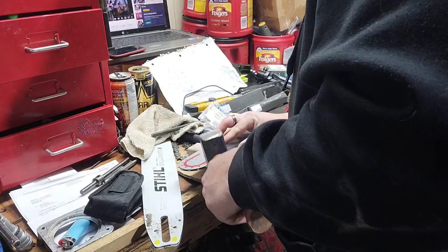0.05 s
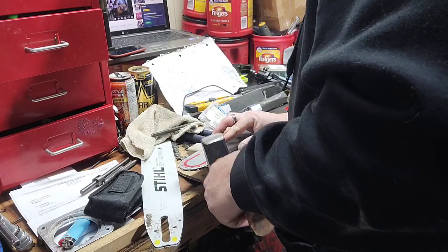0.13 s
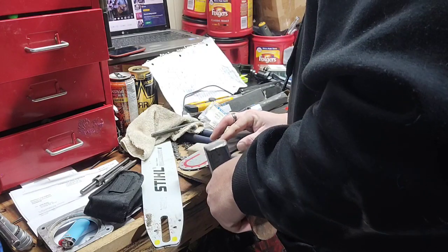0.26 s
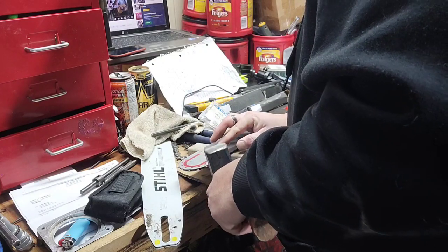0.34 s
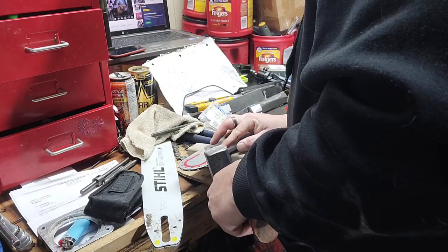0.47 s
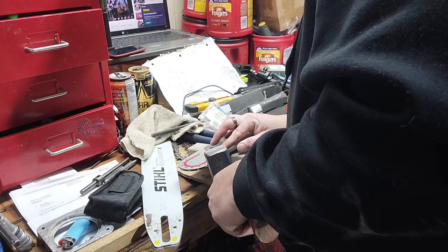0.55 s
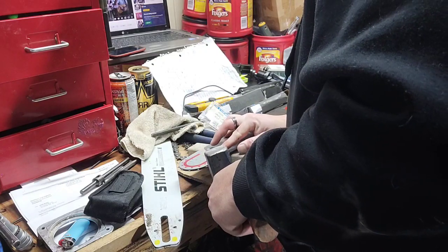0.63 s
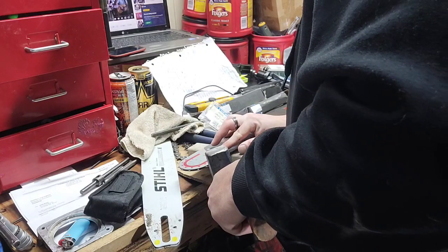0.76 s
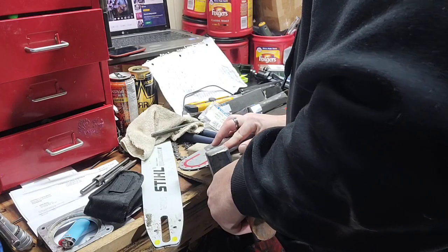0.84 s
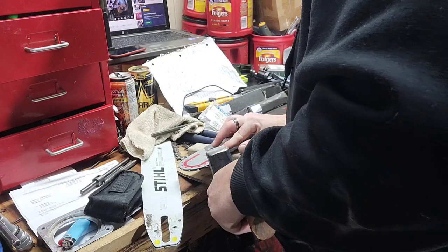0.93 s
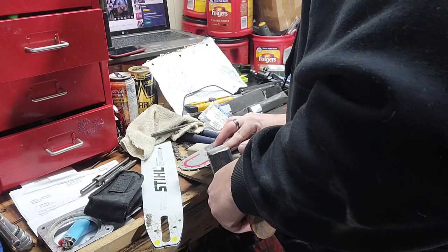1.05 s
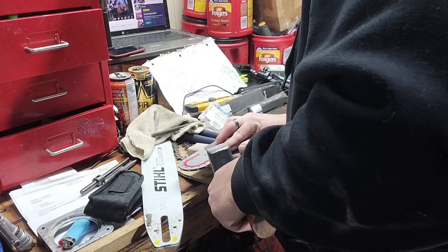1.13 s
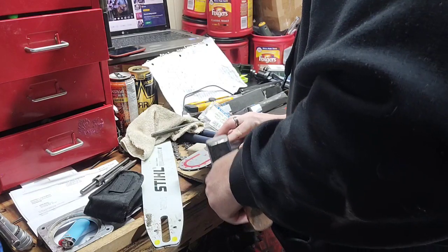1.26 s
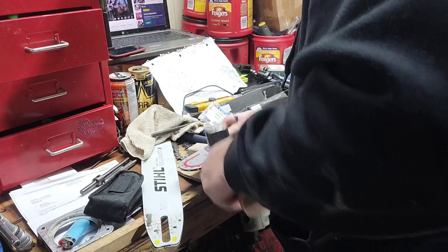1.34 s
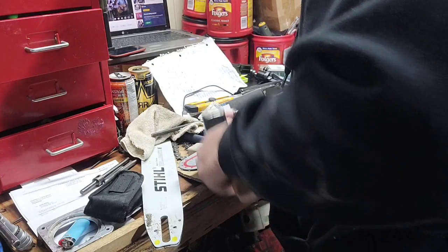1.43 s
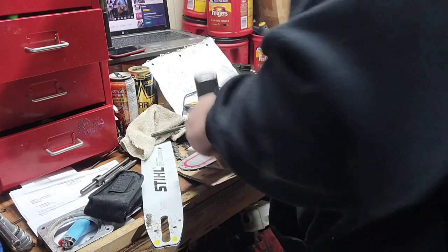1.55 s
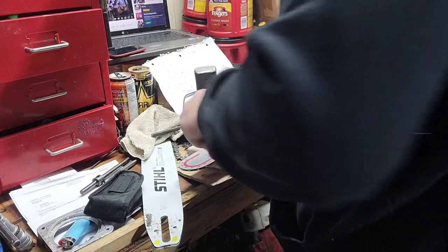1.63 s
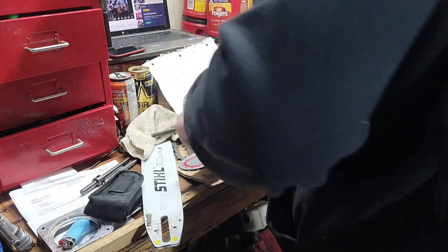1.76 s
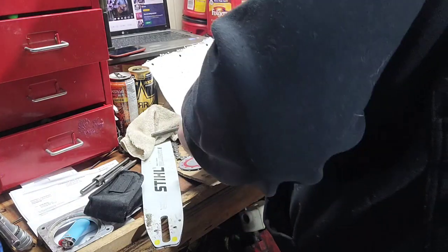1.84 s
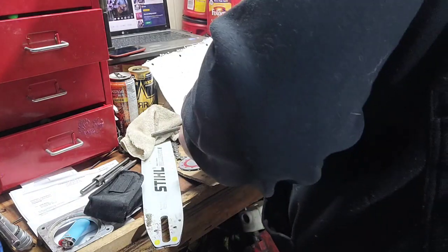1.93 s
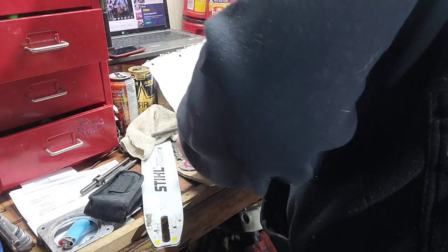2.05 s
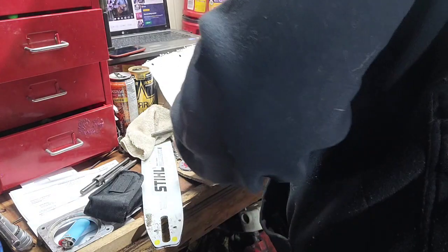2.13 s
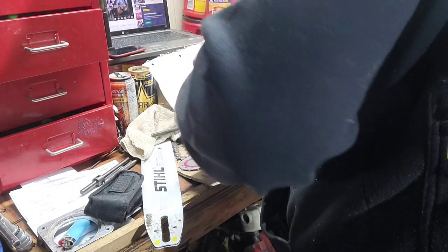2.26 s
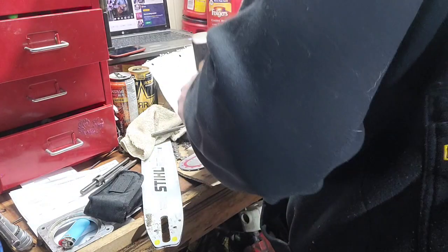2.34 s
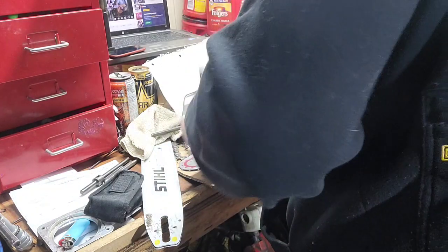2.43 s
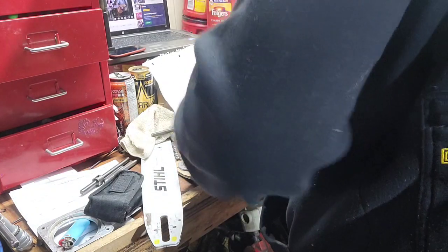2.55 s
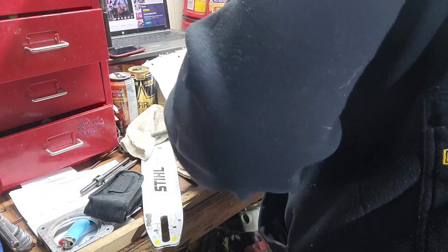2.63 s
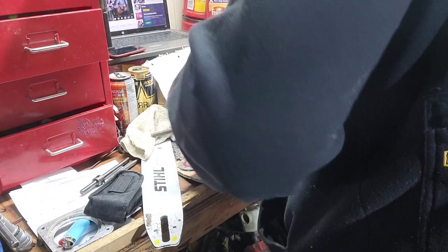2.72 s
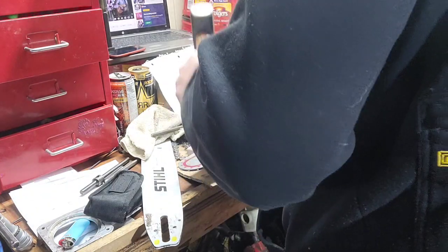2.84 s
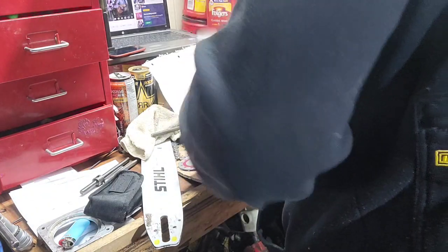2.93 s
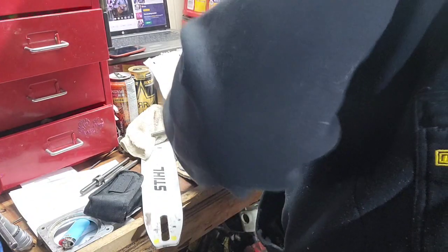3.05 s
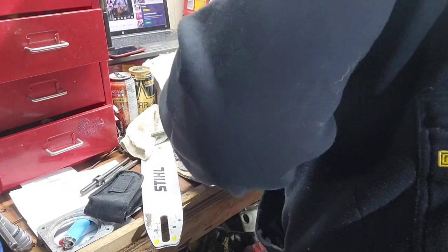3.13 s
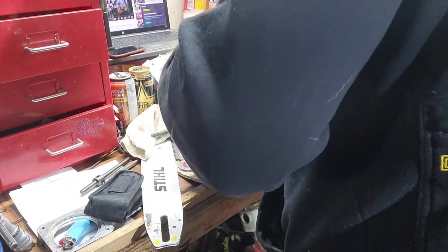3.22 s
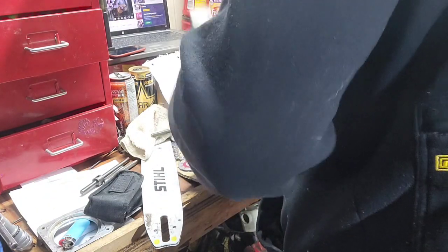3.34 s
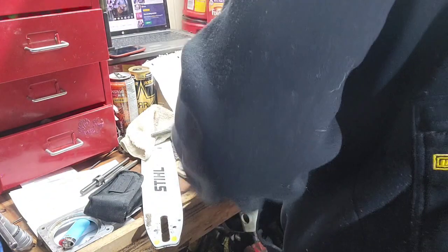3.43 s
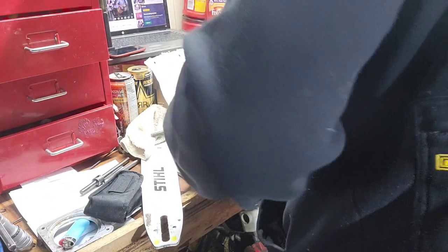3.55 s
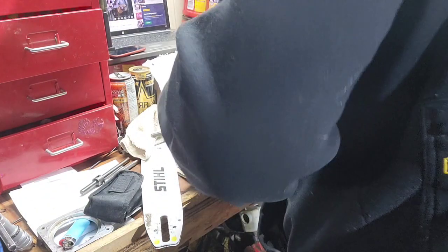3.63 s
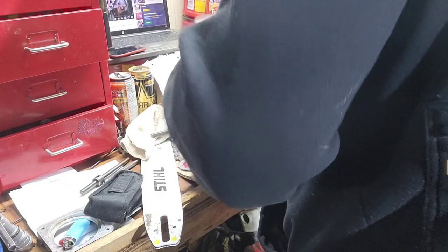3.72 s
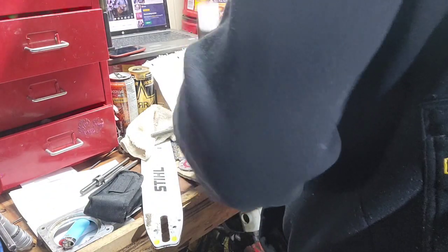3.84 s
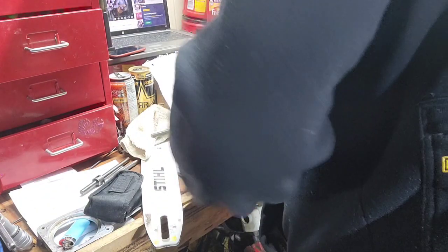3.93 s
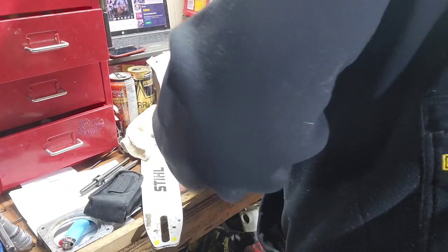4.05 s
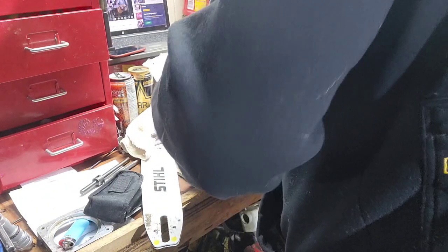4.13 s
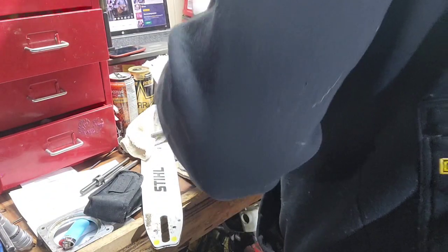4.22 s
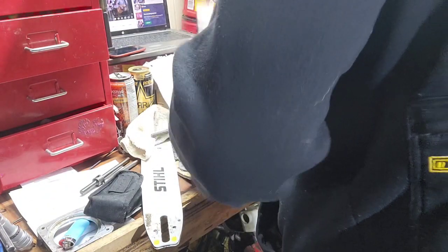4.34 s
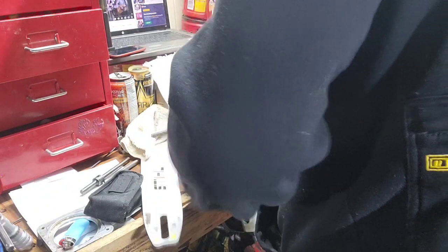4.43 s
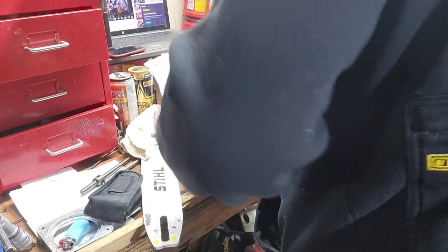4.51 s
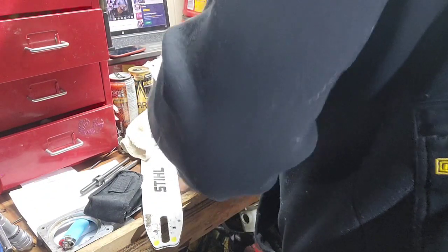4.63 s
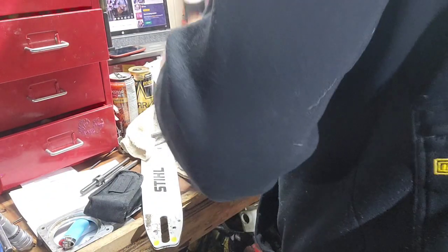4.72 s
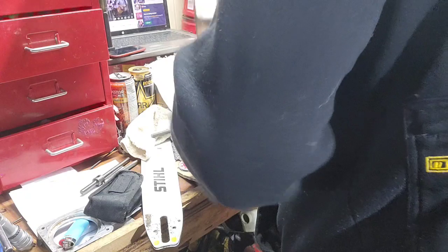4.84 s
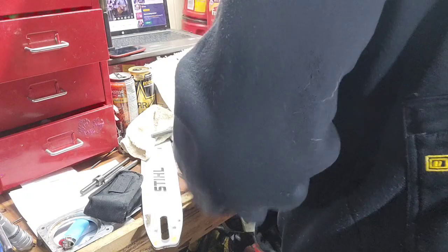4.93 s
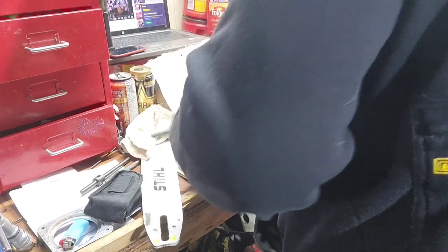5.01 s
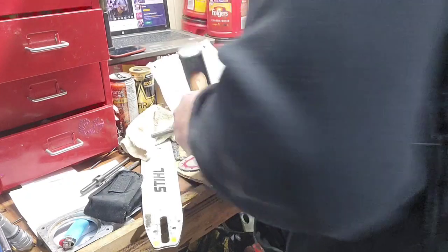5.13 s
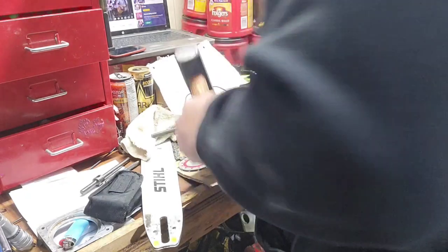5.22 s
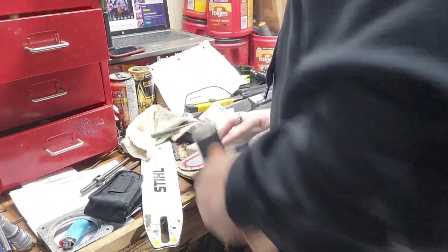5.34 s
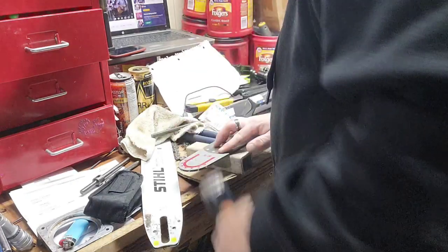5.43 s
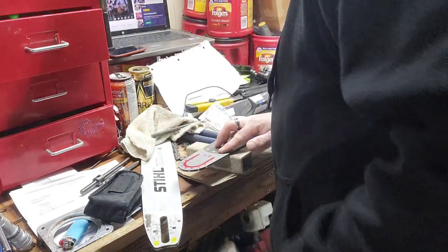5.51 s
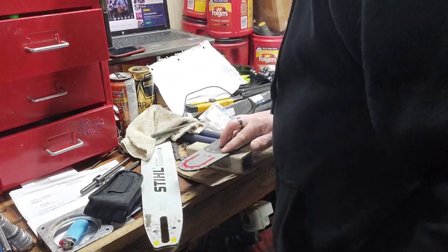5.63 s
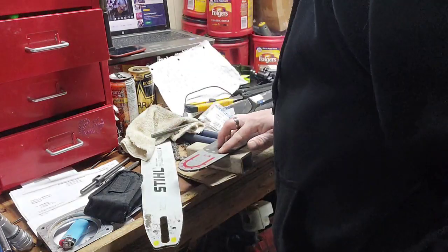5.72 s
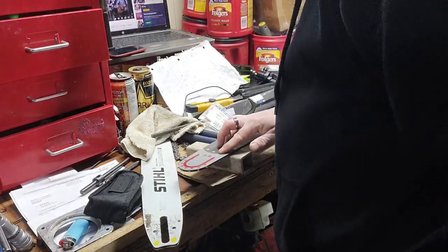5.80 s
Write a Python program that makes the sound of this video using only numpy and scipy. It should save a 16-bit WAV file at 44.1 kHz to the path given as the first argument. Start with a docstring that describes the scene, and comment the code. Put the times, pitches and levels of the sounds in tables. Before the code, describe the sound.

For the first two seconds there is only the low, quiet rush of a small workshop, with two faint swells of rumble, one at the start and one near 1.1 seconds. At about 2.1 seconds a hammer taps softly to take aim. Six hard blows on steel rivets follow, at roughly 2.6, 3.0, 3.5, 4.0, 4.5 and 5.0 seconds. Each is a bright metallic crack with a brief ring, a thump through the wooden bench and a clatter of loose tools jumping and landing. The hammer drops back with a light knock after the first, fourth and last blows. The last blow is the strongest and rings most. From about 5.6 seconds a hand shifts a chain with a very faint scrape and jingle. The stereo microphone stands close on the bench; the blows sound slightly flattened and lean left, with a short room tail.

```python
"""Six hard hammer blows strike steel rivets on a block.
Each blow cracks, rings the steel, thumps the wooden bench and sets loose tools jumping; a small shop
answers. The hammer taps to take aim and drops back after some blows; last, a hand shifts a chain.
Under it lie a low rush and two faint swells of rumble. The stereo camera stands on the bench, and
a limiter on each channel flattens the blows."""
import sys
import numpy as np
from scipy import signal
from scipy.fft import rfft, irfft, next_fast_len
from scipy.io import wavfile
from scipy.ndimage import uniform_filter1d, minimum_filter1d, map_coordinates

SR = 44100
rng = np.random.default_rng(int(sys.argv[2]) if len(sys.argv) > 2 else 0)


def write(x):
    x = np.atleast_2d(x).T
    wavfile.write(sys.argv[1], SR, np.round(np.clip(x, -1, 1) * 32767).astype(np.int16))


N = 258862
T = np.arange(SR * 3 // 5) / SR  # time axis of one event, s

# Hammer blows. Each row: start in s, force in dB, bench jolt in dB, after-ring in dB, tilt in dB/octave.
BLOWS = [(2.551, 11.5, -14.5, -27, -0.1), (3.045, 14, -10, -25.5, 0.28), (3.517, 13, -12, -22.5, 0.5),
         (4.005, 15, -10.5, -23, 1), (4.493, 12.5, -12.5, -23.5, 0), (5.006, 18.5, -12, -11.5, 0.83)]
# Stereo image of the sources. Each row: frequency in Hz, left-right correlation.
CORRELATION = [(300, 1), (700, 0.2), (1500, 0.93), (5000, 0.04)]


def hammer():
    """Steel on steel: a dense crack full of short resonances, then a thin after-ring."""
    # Each row: frequency in Hz, density in dB.
    spectrum = [(150, -52), (300, -21.5), (700, -17.5), (1400, -13.5), (2200, -2.5), (3400, -2),
                (4800, -3.5), (6000, -7.5), (7800, -7), (8700, -14), (11000, -14), (14000, -9), (15300, -4)]
    # Each row: frequency in Hz, left minus right in dB.
    balance = [(300, -2), (700, 14), (1400, 5.5), (2300, 13), (3400, 9.5), (5000, 7.5), (7800, 7.5),
               (14000, 12.5)]
    # Each row: frequency in Hz, t60 in s.
    decay = [(300, 0.43), (800, 0.34), (1600, 0.15), (3200, 0.12), (7000, 0.13), (14000, 0.1)]
    # Free steel once the hammer has left. Each row: frequency in Hz, level in dB, t60 in s.
    free_modes = [(1090, -18, .42), (1225, -4, .22), (7122, -24, .35), (7725, -12, .21), (7865, -19, .42),
                  (9755, -24, .38), (12190, -22, .22), (14190, -21, .42)]
    out = np.zeros((2, N))
    onset = 1 - np.exp(-(T / 0.014) ** 2)  # the crack swells in over about 20 ms
    for start_s, force_db, _, ring_db, tilt_db in BLOWS:
        def colour(hz):
            tilted = amp(along(spectrum, hz) + tilt_db * np.log2(hz + 1))
            return tilted * pan(along(balance, hz)) * steel(hz, width_hz=36, scatter_db=1.5, crowd_db=3)
        crack = damped(unit(filtered(stereo(len(T)), colour)), decay)
        add(out, start_s, amp(force_db) * shop(crack * onset, wet_db=-28.5))
        add(out, start_s, amp(ring_db) * ring(free_modes, scatter_db=1.5) * pan(5))
    return out


def steel(hz, width_hz, scatter_db, crowd_db):
    """Gain of hammer, work and block pressed together; each blow favours other resonances."""
    # Each row: frequency in Hz, peak over the crack in dB.
    modes = [(1225, 7), (1370, 6), (1488, 8.5), (1950, 4), (3050, 8), (3278, 9.5), (3454, 10), (3820, 9),
             (4040, 7), (4143, 3.5), (4468, 11.5), (4796, 6), (5146, 7), (5224, 8), (5552, -2.5),
             (6478, 9.5), (6799, 9), (7989, 12.5), (8940, 1), (9316, 11), (10200, 5.5), (11095, 2),
             (11654, 15.5), (15220, 3)]
    power = sum(amp(db + scatter_db * rng.standard_normal()) ** 2
                / (1 + (2 * (hz - centre_hz) / width_hz) ** 2) for centre_hz, db in modes)
    lesser_modes = wobble(len(hz), 70 / hz[1])  # a knot every 70 Hz
    return np.sqrt(1 + power) * amp(crowd_db * lesser_modes)


def bench(tool_contacts):
    """Blows and landings bend the bench; each blow's jolt runs through the wood into the camera."""
    # Each row: frequency in Hz, level in dB, t60 in s.
    bending_modes = [(72, 5.5, 0.16), (57.4, -15, 0.033), (81, -27, 0.22), (109.6, -3, 0.18),
                     (147, -21, .4)]
    # Each row: frequency in Hz, density in dB.
    jolt_spectrum = [(40, -22.5), (110, -7.5), (180, -14.5), (260, 0), (600, -11), (1400, -7.5),
                     (3000, -26)]
    out = np.zeros((2, N))
    bending = sum(amp(db) * fade(t60_s, 0.027) * np.sin(2 * np.pi * hz * T)
                  for hz, db, t60_s in bending_modes)
    for start_s, _, jolt_db, *_ in BLOWS:
        add(out, start_s, amp(jolt_db) * bending * pan(-12.5))
        add(out, start_s, amp(jolt_db - 5) * noise(jolt_spectrum) * fade(0.11, 0.003) * pan(-24.5))
    for start_s, db in tool_contacts:
        add(out, start_s, amp(db - 15) * bending * pan(-3.5))
    return out


def clutter(tool_contacts):
    """Loose things leap at each blow and fall back; a light link ticks late and a heavy tool bounces."""
    # Metallic click and hard clack. Each row: frequency in Hz, density in dB.
    click_spectrum = [(500, -18.5), (1500, -0.5), (4000, 9), (7500, -3.5), (9000, 1.5), (15000, -7)]
    clack_spectrum = [(600, -15), (950, 3), (1380, -2.5), (1750, -4.5), (2500, -13.5), (5000, -41)]
    link_flight_s = 0.158
    wood, hard = np.zeros((2, N)), np.zeros((2, N))
    for start_s, _, jolt_db, *_ in BLOWS:
        thuds = flurry(40, first_s=0.013, spread_s=0.11, range_db=14, t60_s=0.067) * stereo(len(T))
        chatter = flurry(10, first_s=0.027, spread_s=0.055, range_db=22.5, t60_s=0.01)
        chatter = chatter * noise(click_spectrum)
        add(wood, start_s, amp(jolt_db + 11) * shop(thuds, wet_db=-14.5))
        add(hard, start_s, amp(jolt_db - 22.5) * shop(chatter, wet_db=-14.5))
        tick = noise(click_spectrum) * fade(0.031, 0.0011)
        for landing_s, db in hops(start_s + link_flight_s, jolt_db - 34, count=3):
            add(hard, landing_s, amp(db) * tick)
    for start_s, db in tool_contacts:
        knock = stereo(len(T)) * fade(0.017, 0.00067)
        add(wood, start_s, amp(db + 20.5) * shop(knock, wet_db=-7.5))
        clack = noise(clack_spectrum) * fade(0.072, 0.00025)
        add(hard, start_s, amp(db - 15) * shop(clack, wet_db=-7.5))
        click = noise(click_spectrum) * fade(0.03, 0.00083)
        add(hard, start_s, amp(db - 28.5) * shop(click, wet_db=-5))
    return (boards(wood) + hard) * pan(8.7)


def boards(x):
    """Contacts ring the bench top and what lies on it: band-passes of alternating sign."""
    # Each row: centre in Hz, width in Hz, gain in dB.
    modes = [(236.5, 44, -5.5), (306, 45, 1), (381, 14, 3), (436.5, 14, 1), (554, 49, 3.5),
             (586.2, 24, 7.5), (587.6, 33, 7), (674, 59, -4), (850, 62, 1), (866, 240, -6),
             (1247, 55, -10.5), (1415, 52, -16)]
    return filtered(x, lambda hz: sum(
        (-1) ** k * amp(db) * 1j * hz * width_hz / (centre_hz ** 2 - hz ** 2 + 1j * hz * width_hz)
        for k, (centre_hz, width_hz, db) in enumerate(modes)))


def flurry(count, first_s, spread_s, range_db, t60_s):
    """Envelope of many small landings summed in power; later ones tend to be weaker."""
    flight, weakness = rng.random((2, count))
    index = np.clip((first_s + spread_s * flight) * SR, 0, len(T) - 1).astype(int)
    landings = np.zeros(len(T))
    np.add.at(landings, index, amp(-range_db * (weakness + flight) / 2))
    power = signal.fftconvolve(landings ** 2, fade(t60_s, 0.00017) ** 2)[:len(T)]
    return np.sqrt(np.abs(power))


def heavy_tool():
    """Contacts (s, dB) of a heavy tool that the blows toss off the bench."""
    # Each row: first landing in s, strength in dB.
    landings = [(3.132, -17.5), (3.62, -14), (4.105, -14), (4.584, -9.5), (5.118, -15.5)]
    return [contact for start_s, db in landings for contact in hops(start_s, db, count=5)]


def hops(start_s, db, count, flight_s=0.026, shrink=0.93, scatter=0.15, loss_db=5.5):
    """Contacts (s, dB) of a bouncing object: each weaker, the flights shrinking unevenly."""
    k = np.arange(count)
    flights_s = flight_s * shrink ** k * np.exp(scatter * rng.standard_normal(count))
    return list(zip(start_s + np.cumsum(flights_s) - flights_s, db - loss_db * k))


def light_contacts():
    """Taking aim or dropping back after a blow, the hammer only nudges the block and the wood beneath."""
    # Each row: start in s, level in dB, t60 in s.
    taps = [(2.066, -37, 0.05), (2.075, -32.5, 0.14), (2.095, -33.5, 0.18), (2.123, -30, 0.16)]
    rebounds = [(2.665, -16, 0.059), (2.675, -17, 0.028), (2.793, -36.5, 0.06), (4.183, -28, 0.085),
                (4.83, -49.5, .07), (5.192, -24, 0.081)]
    # Each row: frequency in Hz, density in dB.
    tap_spectrum = [(30, -22), (70, 2), (120, -4), (190, -23), (300, 6.5), (450, -1), (700, -9.5),
                    (1300, -22), (3000, -28), (7000, -36), (15000, -32)]
    rebound_spectrum = [(150, -25), (290, 7.5), (420, 1), (620, 10), (950, -8), (1380, -15), (1750, -24),
                        (3000, -32.5), (12000, -42.5)]
    out = np.zeros((2, N))
    for start_s, db, t60_s in taps:
        add(out, start_s, amp(db) * noise(tap_spectrum) * fade(t60_s, 0.0028) * pan(1))
    for start_s, db, t60_s in rebounds:
        knock = noise(rebound_spectrum) * fade(t60_s, 0.0002)
        add(out, start_s, amp(db) * shop(knock, wet_db=-13) * pan(13))
    return out


def chain():
    """A hand slides the chain on the block, and its links jingle."""
    # Each row: start in s, scrape t60 in s, scrape in dB, jingle in dB.
    shifts = [(5.624, 0.47, -61.5, -85.5), (5.785, 0.51, -59.5, -70)]
    # Each row: frequency in Hz, level in dB, t60 in s.
    link_modes = [(7120, 0, .15), (7300, -4, .12), (9200, -8, .15), (9900, -4, .18), (11050, -3, .18)]
    # Each row: frequency in Hz, density in dB.
    scrape_spectrum = [(300, -5), (700, 3.5), (1500, -11.5), (4500, -24), (6000, -31), (15000, -43)]
    out = np.zeros((2, N))
    for start_s, t60_s, scrape_db, jingle_db in shifts:
        jingle = ring(link_modes, scatter_db=2)
        scrape = noise(scrape_spectrum) * fade(t60_s, 0.0057)
        add(out, start_s, amp(scrape_db) * scrape + amp(jingle_db) * jingle)
    return out * pan(7.1)


def shop(x, wet_db):
    """x plus the small room's short tail."""
    # Each row: frequency in Hz, t60 in s.
    decay = [(100, 0.74), (500, 0.3), (2000, .3), (8000, .3), (15000, 0.21)]
    tail = damped(rng.standard_normal((2, len(T))), decay)
    wet = signal.fftconvolve(x, tail / np.linalg.norm(tail[0]), axes=1)[:, :len(T)]
    return x + amp(wet_db) * wet


def air():
    """The low rush of the shop, wavering a little."""
    # Each row: frequency in Hz, density in dB.
    spectrum = [(15, -64.5), (25, -25.5), (64, 3), (107, -7), (144, 3), (204, -15), (313, -1.5),
                (349, -3.5), (482, -4), (537, -3.5), (1750, -23.5), (15500, -43.5)]
    # Each row: frequency in Hz, left minus right in dB.
    balance = [(60, -11), (150, -6.5), (380, 6.5), (950, 15.5), (2380, 17.5), (5980, 15), (15000, 22)]
    # Each row: frequency in Hz, left-right correlation.
    correlation = [(60, -0.71), (240, 1), (950, -0.5), (3770, -0.018), (15000, -0.011)]
    # Each row: time in s, level in dB.
    levels = [(0, -54), (2.102, -53.5), (5.35, -61), (5.599, -63.5)]
    rush = filtered(stereo(N, correlation), lambda hz: amp(along(spectrum, hz)) * pan(along(balance, hz)))
    level_db = np.interp(np.arange(N) / SR, *np.transpose(levels))
    waver_db = 1.1 * wobble(N, SR / 7)
    return unit(rush) * amp(level_db + waver_db)


def rumble():
    """A low rumble swells and sinks while the work is lined up, mostly on the right."""
    # Each row: peak time in s, half length in s, level in dB.
    swells = [(0.02, .07, -55), (1.147, .13, -59.5)]
    # Each row: frequency in Hz, density in dB.
    spectrum = [(20, -27), (45, -14), (75, 9), (110, -13), (220, -33), (1000, -70)]
    t = np.arange(N) / SR
    envelope = sum(amp(db) * np.exp(-((t - peak_s) / half_s) ** 2) for peak_s, half_s, db in swells)
    return envelope * noise(spectrum, N) * pan(-10)


def amp(db):
    """Decibels to gain."""
    return 10 ** (np.asarray(db) / 20)


def unit(x):
    """x scaled to rms 1."""
    return x / np.sqrt(np.mean(x ** 2) + 1e-20)


def along(points, hz):
    """(Hz, value) points interpolated on a log axis."""
    knots_hz, values = np.transpose(points)
    return np.interp(np.log(hz + 1), np.log(knots_hz), values)


def pan(left_db):
    """Channel gains for a left-minus-right level, single or per frequency."""
    return amp(np.outer([1, -1], left_db) / 2)


def add(track, start_s, sound):
    """Mix a sound into a track."""
    start = round(start_s * SR)
    track[..., start:start + sound.shape[-1]] += sound[..., :track.shape[-1] - start]


def filtered(x, response):
    """x with its spectrum multiplied by response(hz)."""
    size = next_fast_len(x.shape[-1] + 8192)
    return irfft(rfft(x, size) * response(np.fft.rfftfreq(size, 1 / SR)), size)[..., :x.shape[-1]]


def stereo(size, correlation=CORRELATION):
    """Two white noises with a given correlation at each frequency."""
    def mid_side(hz):
        angle = np.arccos(np.clip(along(correlation, hz), -1, 1)) / 2
        return np.array([np.cos(angle), np.sin(angle)])
    mid, side = filtered(rng.standard_normal((2, size)), mid_side)
    return np.array([mid + side, mid - side])


def noise(spectrum, size=len(T)):
    """Coloured stereo noise, rms 1."""
    return unit(filtered(stereo(size), lambda hz: amp(along(spectrum, hz))))


def fade(t60_s, attack_s):
    """A quick rise and an exponential decay."""
    return np.exp(-np.log(1000) * T / t60_s) * (1 - np.exp(-T / attack_s))


def damped(x, decay):
    """Each frequency of x dies with its own t60."""
    hz, t, frames = signal.stft(x, SR, nperseg=128)
    gain = np.exp(-np.log(1000) * t / along(decay, hz)[:, None])
    return signal.istft(frames * gain, SR, nperseg=128)[1][:, :len(T)]


def ring(modes, scatter_db):
    """Damped sines, with random weight and phase at each microphone."""
    return sum(amp(db + scatter_db * rng.standard_normal((2, 1))) * fade(t60_s, 0.00059)
               * np.sin(2 * np.pi * (hz * T + rng.random((2, 1)))) for hz, db, t60_s in modes)


def wobble(size, spacing):
    """A smooth random curve with a knot every spacing points."""
    return map_coordinates(rng.standard_normal(4096), [np.arange(size) / spacing], mode="wrap")


def scene():
    """Everything that reaches the two microphones."""
    contacts = heavy_tool()
    return hammer() + bench(contacts) + clutter(contacts) + light_contacts() + chain() + air() + rumble()


def limiter(x, ceiling_db, hold_s, window_samples):
    """Turns each channel down while its short-term rms is over the ceiling; recovers after a hold."""
    rms = np.sqrt(np.abs(uniform_filter1d(x ** 2, window_samples)) + 1e-12)
    gain = np.minimum(1, amp(ceiling_db) / rms)
    reach = max(1, int(hold_s * SR / 2))
    held = minimum_filter1d(gain, 2 * reach + 1, origin=reach)
    return x * uniform_filter1d(held, window_samples)


def record(dry):
    """The camera limits bass and treble separately, then cuts off steeply at its band limit."""
    crossover_hz, top_hz = 1100, 15520
    low = filtered(dry, lambda hz: 1 / (1 + (hz / crossover_hz) ** 4))
    bass = limiter(low, ceiling_db=-13.5, hold_s=0.0013, window_samples=300)
    treble = limiter(dry - low, ceiling_db=-15.5, hold_s=0.00043, window_samples=160)
    return filtered(bass + treble, lambda hz: 1 / np.sqrt(1 + (hz / top_hz) ** 400))


dry = scene()
out = record(dry)
write(out)
```